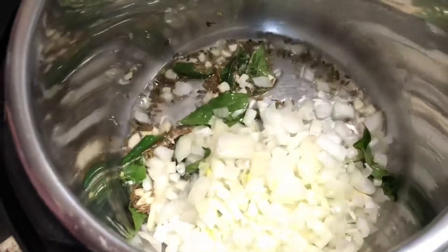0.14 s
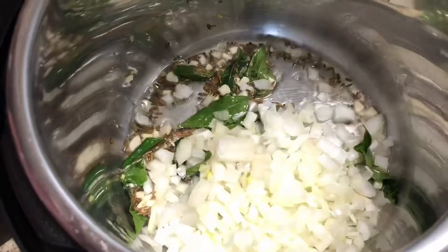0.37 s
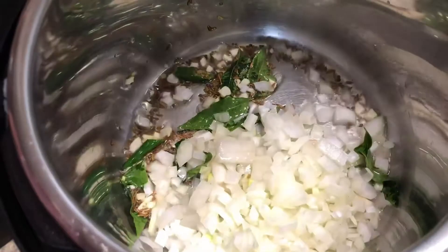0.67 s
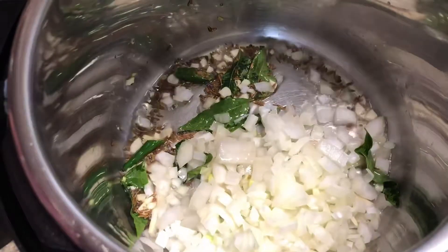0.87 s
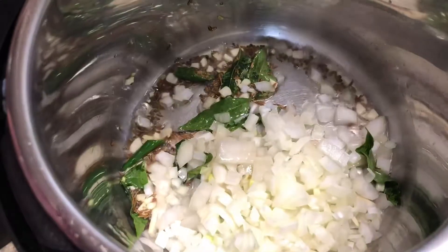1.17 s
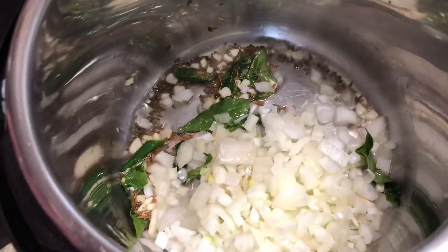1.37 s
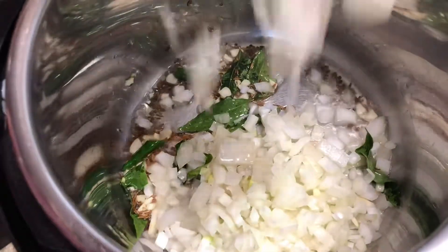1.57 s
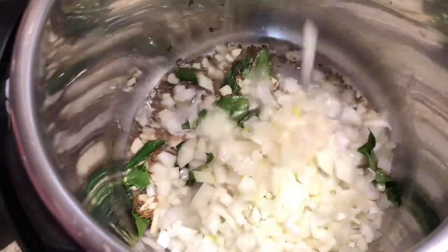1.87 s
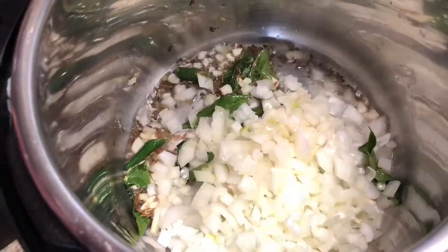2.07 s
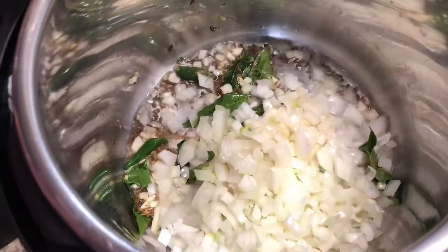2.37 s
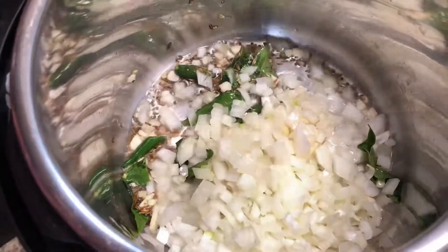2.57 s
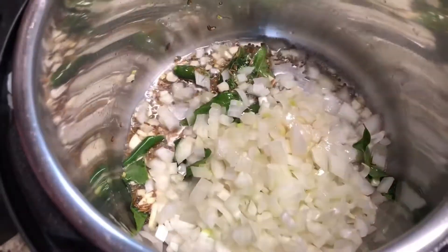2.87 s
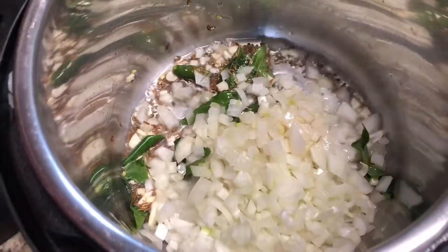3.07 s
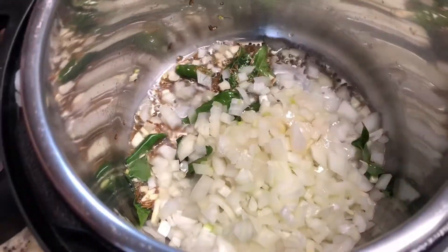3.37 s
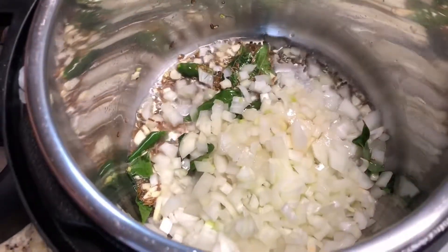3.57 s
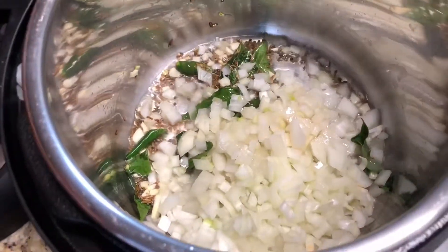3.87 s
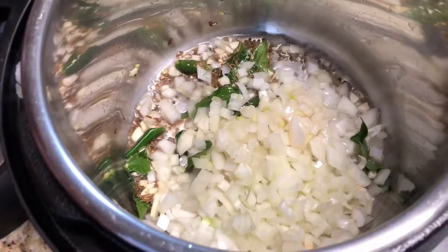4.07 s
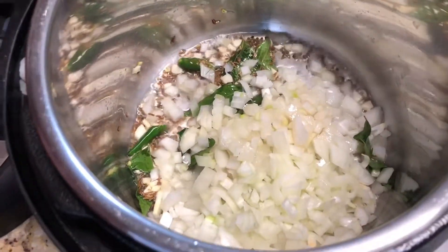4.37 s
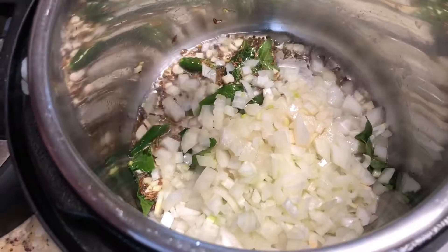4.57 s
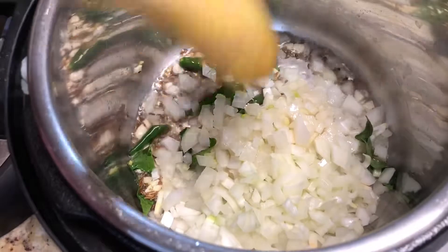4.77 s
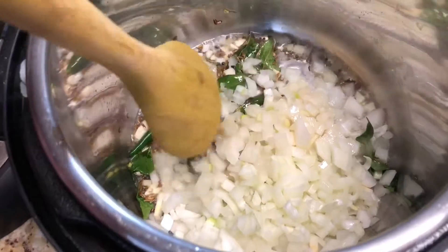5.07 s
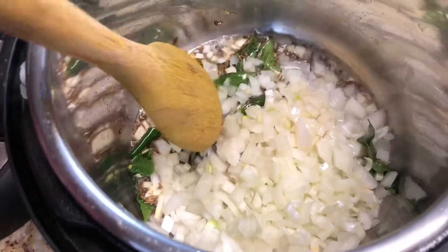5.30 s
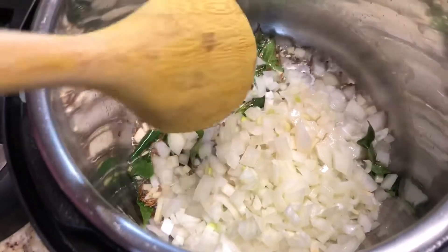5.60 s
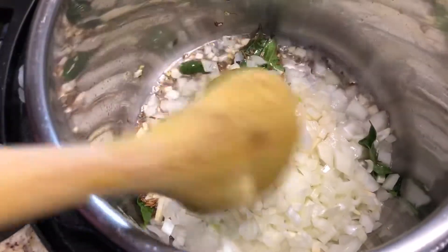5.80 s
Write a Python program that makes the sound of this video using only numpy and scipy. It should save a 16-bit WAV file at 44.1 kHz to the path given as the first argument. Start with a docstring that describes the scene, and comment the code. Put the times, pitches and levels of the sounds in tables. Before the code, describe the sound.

Close above a deep steel pot, diced onion sizzles in hot oil: a bright, airy fizz over fine crackle, dotted with tiny sharp spits. Soft dull knocks sound hollow in the pot. Around three seconds a wetter, denser steaming swells for about a second, then the crackle stays stronger while a wooden spoon reaches in. Very faint appliance hum and quiet kitchen air lie behind.

```python
"""Frying of chopped onion in hot oil, heard from just above the rim of a deep steel pot.
Bursting steam bubbles, modelled as clicks ringing damped resonators, give a bright fizz over a coarser crackle.
Droplets spit as damped sines with noise sprays; the wet heap steams up for a second as a band of denser bubbling.
Simmering and knocks of onion and a wooden spoon ring the pot's air, modelled as narrow spectral peaks.
Behind lie an appliance's faint hum, as wavering sines, and the kitchen's air, as shaped noise."""
import sys
import numpy as np
from scipy import signal
from scipy.fft import rfft, irfft
from scipy.io import wavfile

SR = 44100
rng = np.random.default_rng(int(sys.argv[2]) if len(sys.argv) > 2 else 0)


def master_out(mix):
    """Clip the mix to full scale and print it as 16-bit PCM to the path in sys.argv[1]."""
    frames = np.transpose(np.atleast_2d(mix))
    ceiling = np.clip(frames, -1, 1)
    pcm = np.round(ceiling * 32767).astype(np.int16)
    wavfile.write(sys.argv[1], SR, pcm)


N = 261954
TIME = np.arange(N) / SR   # t/s

# vigour of the frying, as the finest bubbles' level before flicker and echoes: [t/s, level/dB]
FIZZ = [(0, -34), (.82, -31.5), (1.0, -33.5), (1.3, -33.8), (1.83, -32.5), (2.25, -33), (2.5, -32.5),
        (2.92, -33.5), (3.08, -30), (3.4, -32.5), (3.8, -30), (4.06, -30.2), (4.23, -31.5), (4.5, -29),
        (4.9, -31), (5.94, -33)]
# spectrum of the finest bubbles: [f/Hz, level/dB per Hz]
FIZZ_COLOUR = [(2000, -59), (5000, -32), (7800, -11), (9000, -0.5), (10200, 0), (11000, 0.8), (12200, 2.3),
               (13700, 2.1), (14800, 2), (17000, -0.5)]
# spectrum of the larger bubbles: [f/Hz, level/dB per Hz]
CRACKLE_COLOUR = [(1500, -35), (3500, -25), (4700, -12), (5600, -5), (6600, 1.5), (7600, 2.5), (8500, 1.5),
                  (9500, -10), (13000, -15), (20000, -46)]
# spectrum of the moist fringe of the heap bubbling in the oil: [f/Hz, level/dB per Hz]
FRINGE_COLOUR = [(200, -43), (1600, -16), (2300, -8), (2800, -5.5), (3400, -1), (4400, -1), (5400, 0.5),
                 (6300, -1), (9000, -12), (20000, -47)]
# spectrum of the steam: [f/Hz, level/dB per Hz]
STEAM_COLOUR = [(200, -45), (1800, -37), (2150, -10.5), (2450, -3), (3000, -1.5), (3500, 3.5), (4650, -1.5),
                (5200, 1.5), (5680, 4.5), (6200, -14), (9000, -29), (20000, -45)]
# patches flaring up or falling quiet, one bubble size each: [start t/s, length/s, f/Hz, width/Hz, lift/dB]
FLARES = [(0, 1.17, 13400, 1900, 4.5), (0.405, 0.12, 8100, 1100, -4.5), (0.616, 0.15, 2500, 900, 3.5),
          (1.3, 1.6, 9750, 1200, 3.5), (2.01, .14, 5400, 2400, -6), (2.35, 0.43, 2480, 600, -1.5),
          (2.806, 0.11, 3900, 1200, 3.5), (2.984, 0.21, 8300, 2400, 2.5), (3.213, .65, 12000, 1100, 3.5),
          (3.884, .26, 10500, 1400, 4.5), (4.423, 0.28, 5330, 1400, 1.5), (5.153, 0.28, 3670, 600, 4),
          (5.6, .4, 13900, 2400, 3)]
# a hollow wandering through the hiss from the steaming on: [t/s, f/Hz, depth/dB]
HOLLOW = [(2.98, 4750, 0), (3.25, 6370, 8), (3.5, 7000, 4.5), (3.92, 7600, 8), (4.1, 7650, 3),
          (4.37, 4360, 2.5), (4.75, 4450, 3), (5.2, 5600, 7.5), (5.94, 4700, 2.5)]
# spitting droplets at set moments: [t/s, nominal peak level/dB, f/Hz, spray/dB under the peak]
SPITS = [(.379, -21, 10900, 13), (.7435, -21, 12400, 8), (.8245, -21, 13400, 13), (.830, -19, 13000, 14),
         (2.128, -20, 10300, 15), (2.267, -24, 13000, 7), (3.312, -21, 12300, 17), (3.315, -20, 12600, 15),
         (3.455, -20, 7500, 15), (4.55, -21, 10100, 16), (4.762, -22, 12800, 9), (4.783, -22, 10800, 23),
         (5.084, -20.5, 11400, 8), (5.430, -25, 11500, 7)]
# larger single bubbles that ping: [t/s, peak level/dB before the pot's ring, f/Hz]
PINGS = [(.843, -37.5, 4400), (1.304, -38.5, 4400)]
# soft knocks of settling onion and of the spoon: [t/s, nominal peak level/dB]
KNOCKS = [(.061, -50), (0.15, -50), (0.433, -44.5), (1.384, -44), (1.487, -43), (2.276, -40.5),
          (3.532, -43), (3.635, -38.5), (5.093, -43), (5.405, -39.5)]
# spectrum of the knocks: [f/Hz, level/dB per Hz]
KNOCK_COLOUR = [(60, -45), (250, -14), (450, -2.5), (900, -4.0), (1250, 1.5), (1650, -4),
                (2600, -17), (5000, -11), (12000, -45)]
# spectrum of the simmering under the heap: [f/Hz, level/dB per Hz]
SIMMER_COLOUR = [(50, -33), (280, -16), (380, -6), (440, 1), (700, -2), (1000, -3), (1400, -0.5),
                 (1650, -6), (2200, -8.5), (3200, -17), (6000, -23.5), (20000, -51)]
# the pot's weaker, higher resonances: [f/Hz, width/Hz, lift/dB]
POT_RING = [(1770, 60, 4), (1978, 36, 6.5), (2455, 29, 4.5), (2720, 33, 4), (2910, 26, 5.5),
            (3250, 51, 3.5), (3390, 40, 3.5), (3680, 40, 2), (3920, 43, 2), (4290, 230, 3), (4510, 42, 0.5),
            (5570, 120, 1.5), (5170, 52, 0.5)]
# appliance hum: [f/Hz, rms level/dB]
HUM = [(119.9, -74.5), (153, -84), (210.6, -75.5), (237, -82)]
# spectrum of the kitchen air: [f/Hz, level/dB per Hz]
ROOM_COLOUR = [(5, 8), (25, 2), (55, -1), (90, -4.5), (170, -5), (300, -1), (600, -12.5), (2000, -16),
               (20000, -50)]

# level at mean vigour, and share of the vigour's swing that is followed
CRACKLE_DB, CRACKLE_FOLLOWS = -38.5, 0.45
FRINGE_DB, FRINGE_FOLLOWS = -51, 0.23   # level at the start
SIMMER_DB = -56.5   # level at the start
# as the onion warms and sheds water, the low bubbling grows
FRINGE_DB_PER_S, SIMMER_DB_PER_S = 0.47, 0.6
# after the steaming the freed juice reaches the oil and the crackle stays louder
JUICE_START_S, JUICE_ATTACK_S, JUICE_DB = 4.28, 0.037, 4
FLARE_ATTACK_S, FLARE_RELEASE_S = 0.047, 0.044
HOLLOW_WIDTH_HZ = 620
# the heap steams up once
STEAM_START_S, STEAM_ATTACK_S, STEAM_HOLD_S, STEAM_RELEASE_S = 3.057, 0.13, 0.76, 0.24
STEAM_DB, STEAM_SWELL_DB_PER_S = -45.5, 5
# central values of further droplets, which spit at random
RANDOM_SPITS_PER_S, RANDOM_SPIT_DB, RANDOM_SPIT_HZ, RANDOM_SPRAY_DB = 2.8, -23.5, 12300, 16
# the wooden spoon reaches into the opening, stays, withdraws, and muffles the crackle
SPOON_START_S, SPOON_ATTACK_S, SPOON_HOLD_S, SPOON_RELEASE_S = 4.6, 0.34, 0.46, 0.12
SPOON_MUFFLE_DB = -2.5
# the pot's upright air resonance
UPRIGHT_HZ, UPRIGHT_WIDTH_HZ, UPRIGHT_LIFT_DB = 515, 43, 8.74
# its crosswise air resonance sinks slowly, and further under the spoon
CROSS_HZ, CROSS_SAG_HZ_PER_S, CROSS_SPOON_DROP_HZ = 1280, 8, 65
CROSS_WIDTH_HZ, CROSS_LIFT_DB = 48, 13
# the next one comes out little by little, from a slight dip at the start
OVERTONE_HZ, OVERTONE_WIDTH_HZ, OVERTONE_LIFT_DB, OVERTONE_DB_PER_S = 1850, 270, -1, 1.15
ROOM_DB = -63
CUTOFF_HZ = 15780


def sizzle():
    """Superposition: bubble populations of several sizes add, and film snaps reach across them all."""
    snaps = rms_one(bursts(per_s=5500, spread_db=3.0))
    fizz_db, = in_time(FIZZ)
    vigour_db = fizz_db - fizz_db.mean()
    flicker = from_db(0.5 * drift(35) + 0.59 * drift(350))
    bright = flicker * (fizz(snaps, fizz_db) + crackle(snaps, vigour_db))
    hiss = wall_echoes(bright, echo_db=-21.0, sway_s=0.000025) + fringe(snaps, vigour_db)

    bells = []
    for start_s, length_s, hz, width_hz, lift_db in FLARES:
        flare = swell(start_s, FLARE_ATTACK_S, length_s - FLARE_ATTACK_S, FLARE_RELEASE_S)
        bells.append((hz, width_hz, lift_db * flare))
    hollow_hz, depth_db = in_time(HOLLOW)
    bells.append((hollow_hz, HOLLOW_WIDTH_HZ, -depth_db))
    return moving_bells(hiss, bells, size=512) + steam(snaps)


def fizz(snaps, level_db):
    """Size-pitch relation: the finest bubbles ring highest."""
    fine = bubbles(per_s=20000, spread_db=2.5, low_hz=6450, high_hz=17200, cycles=11.7,
                   patchy_db=2.5, count=20)
    return from_db(level_db) * coloured(fine + from_db(-5.0) * snaps, FIZZ_COLOUR)


def crackle(snaps, vigour_db):
    """Size-pitch relation: larger bubbles ring lower, louder with the juice and muffled by the spoon."""
    coarse = bubbles(per_s=15000, spread_db=2.5, low_hz=3390, high_hz=10560, cycles=16, patchy_db=2.0)
    juice = np.clip((TIME - JUICE_START_S) / JUICE_ATTACK_S, 0, 1)
    level_db = CRACKLE_DB + CRACKLE_FOLLOWS * vigour_db
    level_db = level_db + JUICE_DB * juice + SPOON_MUFFLE_DB * spoon()
    return from_db(level_db) * coloured(coarse + from_db(-8.5) * snaps, CRACKLE_COLOUR)


def fringe(snaps, vigour_db):
    """Size-pitch relation: bubbling at the moist fringe rings lower still, with a steady rise in level."""
    moist = bubbles(per_s=8000, spread_db=2.0, low_hz=2000, high_hz=6470, cycles=16.3, patchy_db=2.5)
    level_db = FRINGE_DB + FRINGE_FOLLOWS * vigour_db + FRINGE_DB_PER_S * TIME
    return from_db(level_db) * coloured(moist + from_db(-7.5) * snaps, FRINGE_COLOUR)


def steam(snaps):
    """Amplitude modulation: the swelling gain of the steam gates wet bubbling and film snaps."""
    wet = bubbles(per_s=13000, spread_db=2.0, low_hz=2000, high_hz=6460, cycles=11.0, patchy_db=1.5)
    return steaming() * coloured(wet + from_db(3.5) * snaps, STEAM_COLOUR)


def steaming():
    """Envelope principle: the gain of the steam swells while it lasts, then decays."""
    on = swell(STEAM_START_S, STEAM_ATTACK_S, STEAM_HOLD_S, STEAM_RELEASE_S)
    since = np.clip(TIME - STEAM_START_S, 0, STEAM_HOLD_S)
    return on * from_db(STEAM_DB + STEAM_SWELL_DB_PER_S * since)


def bubbles(per_s, spread_db, low_hz, high_hz, cycles, patchy_db, count=14):
    """Damped resonance: each burst rings for a few cycles (to -60 dB) at its pitch, in flurries; rms 1."""
    clicks = bursts(per_s, spread_db)
    size_class = rng.integers(0, count, N)
    pitches = np.linspace(low_hz, min(high_hz, 0.45 * SR), count)
    total = np.zeros(N)
    for k, hz in enumerate(pitches):
        flurries = from_db(patchy_db * drift(6.1))
        total += flurries * ring(clicks * (size_class == k), hz, cycles / hz)
    return rms_one(total)


def bursts(per_s, spread_db):
    """Poisson statistics: clicks at random moments, many small and a few large, of either sign."""
    sizes = from_db(spread_db * np.minimum(rng.exponential(1, N), 6))
    return sizes * rng.choice([-1, 1], N) * (rng.random(N) < per_s / SR)


def wall_echoes(x, echo_db, sway_s, count=6):
    """Reflection: the steel wall returns close echoes; delays sway with the hand-held microphone."""
    delays = rng.uniform(0.001, 0.005, count)
    echoes = np.zeros(N)
    for delay in delays:
        echoes += np.interp(TIME - delay - sway_s * drift(0.73), TIME, x, left=0)
    return (x + from_db(echo_db) * echoes) / np.sqrt(1 + 0.5 * count * from_db(2 * echo_db))


def spits():
    """Impulsive radiation: a droplet gives a damped sine and a brief noise spray, both high-passed."""
    out, t = np.zeros(N + SR), np.arange(SR // 40) / SR
    at_random = []
    for when, size, pitch in rng.uniform(-0.91, 1, (int(RANDOM_SPITS_PER_S * N / SR), 3)):
        hz = RANDOM_SPIT_HZ * (1 + 0.12 * pitch)
        at_random.append((abs(when) * N / SR, RANDOM_SPIT_DB + 2 * size, hz, RANDOM_SPRAY_DB))
    for s, db, hz, spray_db in list(SPITS) + at_random:
        ping = np.sin(2 * np.pi * hz * t) * np.exp(-t / 0.0003)
        spray = from_db(-spray_db) * rng.standard_normal(len(t)) * np.exp(-t / 0.0035)
        at = int(s * SR)
        out[at:at + len(t)] += from_db(db + 9.5) * (ping + spray)
    return signal.sosfilt(signal.butter(2, 7500, "high", fs=SR, output="sos"), out[:N])


def ticks(per_s, click_db):
    """Inhomogeneous Poisson process: lone band-passed cracks of the oil film, more often as the fizz swells."""
    swell_db = in_time(FIZZ)[0] - np.mean(np.array(FIZZ)[:, 1])
    born = rng.random(N) < per_s * from_db(2 * swell_db) / SR
    clicks = born * rng.choice([-1, 1], N) * from_db(click_db + rng.uniform(-1, 0, N))
    band = signal.butter(2, [10500, 15500], "band", fs=SR, output="sos")
    return signal.sosfilt(band, clicks + 1e-18)


def pings():
    """Free vibration: a large bubble rings on for a few hundredths of a second."""
    total = np.zeros(N)
    for s, db, hz in PINGS:
        click = np.arange(N) == int(s * SR)
        total += ring(from_db(db) * click, hz, t60=0.027)
    return total


def pot():
    """Cavity resonance: muffled simmering, steam gurgle and knocks excite the air standing in the pot."""
    simmer_db = SIMMER_DB + SIMMER_DB_PER_S * TIME
    simmer = from_db(simmer_db) * coloured(bursts(per_s=3500, spread_db=3.0), SIMMER_COLOUR)
    low_bubbles = bubbles(per_s=1500, spread_db=1.0, low_hz=618, high_hz=990, cycles=45,
                          patchy_db=3.0, count=5)
    gurgle = steaming() * from_db(-16.5) * low_bubbles
    cross_hz = CROSS_HZ - CROSS_SAG_HZ_PER_S * TIME - CROSS_SPOON_DROP_HZ * spoon()
    overtone_db = OVERTONE_LIFT_DB + OVERTONE_DB_PER_S * TIME
    modes = [(UPRIGHT_HZ, UPRIGHT_WIDTH_HZ, UPRIGHT_LIFT_DB),
             (cross_hz, CROSS_WIDTH_HZ, CROSS_LIFT_DB),
             (OVERTONE_HZ, OVERTONE_WIDTH_HZ, overtone_db)]
    return moving_bells(simmer + gurgle + knocks(), modes, size=2048)


def knocks():
    """Damped impact: dull contacts start at once and decay within milliseconds."""
    force = np.zeros(N)
    for s, db in KNOCKS:
        force += from_db(db - 2.5) * np.exp(-np.abs(TIME - s) / 0.006) * (TIME >= s)
    return force * coloured(rng.standard_normal(N), KNOCK_COLOUR)


def spoon():
    """Partial obstruction: how far the spoon covers the opening (0-1)."""
    return swell(SPOON_START_S, SPOON_ATTACK_S, SPOON_HOLD_S, SPOON_RELEASE_S)


def kitchen():
    """Phase modulation: faint sines waver in phase, over the shaped noise of the room."""
    hum = np.zeros(N)
    for hz, rms_db in HUM:
        phase = 2 * np.pi * hz * TIME + 0.9 * drift(2.6)
        hum += from_db(rms_db) * np.sqrt(2) * np.sin(phase)
    return hum + from_db(ROOM_DB) * coloured(rng.standard_normal(N), ROOM_COLOUR)


def ring(clicks, hz, t60):
    """Two-pole resonator: a unit click starts a sine of initial height 1 that falls 60 dB in t60 seconds."""
    r, w = from_db(-60 / (t60 * SR)), 2 * np.pi * hz / SR
    return signal.lfilter([0, np.sin(w)], [1, -2 * r * np.cos(w), r * r], clicks + 1e-18)


def moving_bells(x, bells, size):
    """Resonance curve: lift or dip bands (f/Hz, width/Hz, level/dB), each steady or one value a sample."""
    hz, s, frames = signal.stft(x, SR, nperseg=size)
    for bell in bells:
        centre, width, db = [np.interp(s, TIME, np.broadcast_to(v, N)) for v in bell]
        near = 1 / (1 + (2 * (hz[:, None] - centre) / width) ** 2)
        power = 1 + (from_db(2 * np.abs(db)) - 1) * near
        frames = frames * power ** (np.sign(db) / 2)   # a dip is the inverse of a lift
    return signal.istft(frames, SR, nperseg=size)[1][:N]


def coloured(x, spectrum):
    """Spectral shaping: weight by a curve drawn over log frequency; rms 1."""
    hz, db = np.transpose(spectrum)
    bins = np.maximum(np.fft.rfftfreq(N, 1 / SR), 1)
    gain = from_db(np.interp(np.log(bins), np.log(hz), db))
    return rms_one(irfft(rfft(x) * gain, N))


def drift(rate_hz):
    """Low-passed noise: a smooth random wander of spread about 1, made at a sixteenth of the sample rate."""
    r = np.exp(-32 * np.pi * rate_hz / SR)
    noise = rng.standard_normal(N // 16 + 2002)
    slow = signal.lfilter([1], [1, -2 * r, r * r], noise)[2000:]   # drop the settling
    return np.interp(np.arange(N) / 16, np.arange(len(slow)), rms_one(slow))


def swell(start_s, attack_s, hold_s, release_s):
    """Envelope from 0 to 1: linear rise, hold, exponential decay."""
    since = TIME - start_s
    release = np.exp(-np.maximum(since - attack_s - hold_s, 0) / release_s)
    return np.clip(since / attack_s, 0, 1) * release


def in_time(rows):
    """Linear interpolation: the columns of a curve at every sample."""
    s, *columns = np.transpose(rows)
    return [np.interp(TIME, s, c) for c in columns]


def rms_one(x):
    """Normalisation to unit mean power."""
    return x / np.sqrt(np.mean(x ** 2) + 1e-20)


def from_db(db):
    """Logarithmic level to amplitude gain."""
    return 10 ** (np.asarray(db) / 20)


def scene():
    """Superposition and resonance: everything in the pot takes on its ring; both channels are alike."""
    pops = spits() + pings() + ticks(per_s=15, click_db=-5.0)
    frying = moving_bells(sizzle() + pops + pot(), POT_RING, size=2048)
    return np.tile(frying + kitchen(), (2, 1))


def record(dry):
    """Band limitation: a steep elliptic low-pass cuts the top."""
    return signal.sosfilt(signal.ellip(12, 0.1, 80, CUTOFF_HZ, fs=SR, output="sos"), dry)


dry = scene()
out = record(dry)
master_out(out)
```